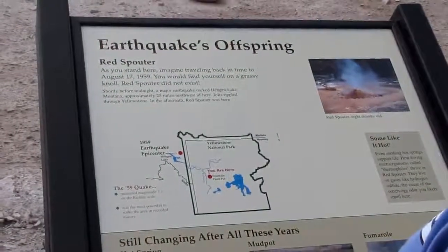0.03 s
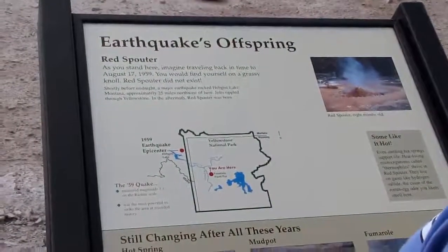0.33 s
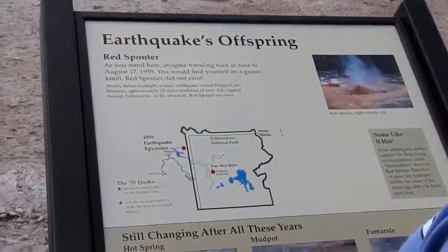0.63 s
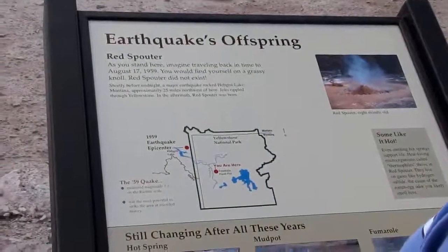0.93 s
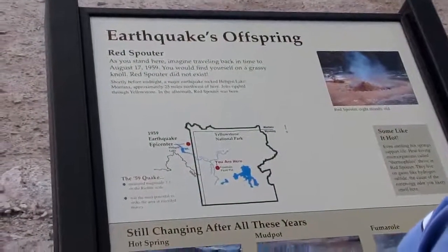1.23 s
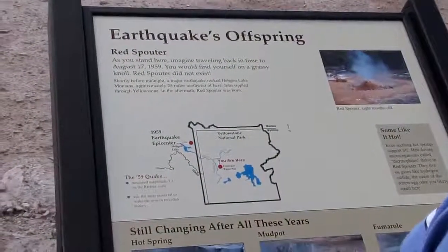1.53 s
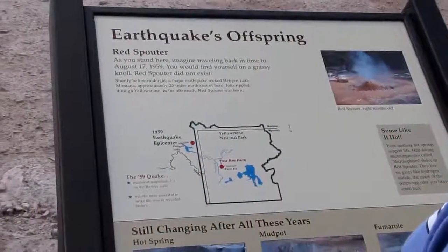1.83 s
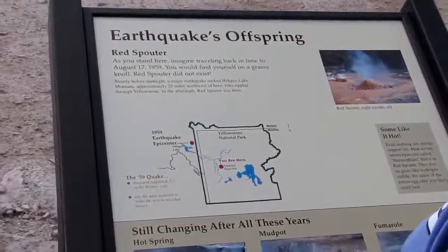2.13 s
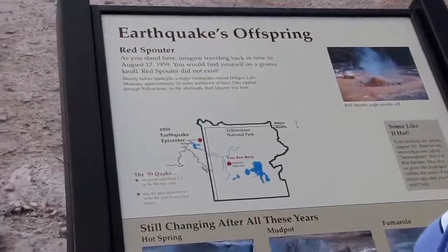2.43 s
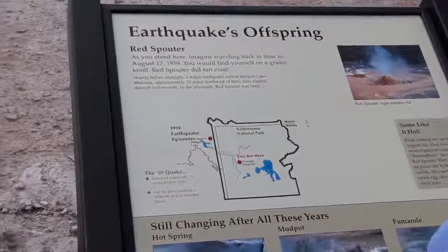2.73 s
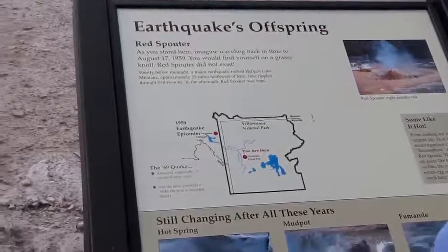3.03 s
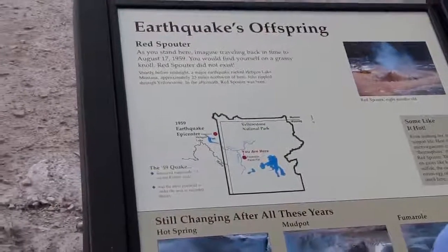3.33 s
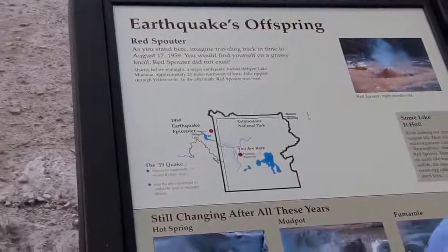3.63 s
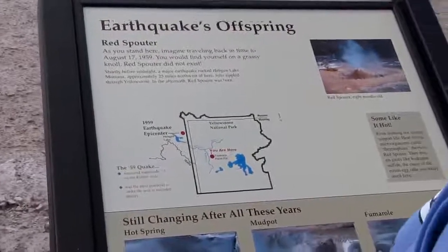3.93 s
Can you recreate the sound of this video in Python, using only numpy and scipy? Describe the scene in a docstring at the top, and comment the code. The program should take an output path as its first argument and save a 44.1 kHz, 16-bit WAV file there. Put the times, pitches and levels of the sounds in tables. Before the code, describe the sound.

Steam hisses loudly and continuously from a vent in open ground, over a hollow rumble. A few brief sharper spurts and faint whistles flicker through the rush, which cuts off abruptly near the end.

```python
"""A wide turbulent hiss with a hollow rumble: steam rushing from a fumarole in open ground.
The vent's throat rings under the jet, with brief sharper spurts and faint wavering whistles.
A hard surface close by returns one short echo that combs the hiss.
Recorder gain control briefly ducks the midrange after an early loud spurt.
The sound cuts off abruptly near the end."""
import sys
import numpy as np
from scipy import signal
from scipy.fft import rfft, irfft
from scipy.io import wavfile

SR = 44100
rng = np.random.default_rng(int(sys.argv[2]) if len(sys.argv) > 2 else 0)


def pcm_store(signal):
    """Save signal as 16-bit PCM."""
    levels = np.round(np.clip(np.atleast_2d(signal), -1, 1) * 32767)
    wavfile.write(sys.argv[1], SR, levels.astype(np.int16).T)


N = 176400

# Broad colour of the jet. Each row: frequency in Hz, relative level in dB.
JET_SPECTRUM = [(15, -59), (32, -29.5), (53, -19), (100, -10.5), (168, -7.5), (195, -3.5), (290, -12),
                (385, -10), (440, -7), (495, -14), (560, -7.5), (620, -11), (730, -10.5), (1000, -4.5),
                (1100, -9.5), (1190, -7), (1300, -8), (1390, -4.5), (1580, -7), (1950, -7), (2250, -3),
                (2700, -4), (2780, -5), (3080, -2), (3550, -4), (4700, -4.5), (5150, -2.7), (6200, -6),
                (7400, -7.5), (8200, -11), (8800, -13), (9400, -11), (10800, -13.5), (12000, -17.5),
                (13300, -21), (14400, -23), (15800, -25)]
# Throat resonances. Each row: centre in Hz, width in Hz, lift in dB.
THROAT_MODES = [(133.4, 26, 10.5), (360, 79, 4.5), (814.4, 66, 8.5), (878, 63, 9), (928.6, 27, 7),
                (1684, 65, 7), (1830, 61, 5.5), (2127, 27, 5)]
# Swells of rumble, hiss and hollow ring. Each row: time in seconds, relative level in dB.
RUMBLE_SWELL = [(0.0, -35.5), (0.05, -33.5), (0.12, -38), (0.17, -32.5), (0.26, -35), (0.32, -34.5),
                (0.47, -37), (0.64, -34), (2.34, -31.5), (2.47, -33), (3.57, -30.5), (3.6, -29.5)]
HISS_SWELL = [(0, -1.5), (.2, -0.7), (.33, 2.6), (.55, 1), (.8, -0.5), (1.05, 1.5), (1.25, -0.5),
              (1.55, 0.8), (1.8, 0.8), (2.0, 0.5), (2.25, 0.3), (2.45, 1.2), (2.72, 0), (3.0, 0),
              (3.17, 0.5), (3.35, -1), (3.6, -0.2)]
RING_SWELL = [(0, 0), (.3, 0.7), (.5, 1.5), (.95, -0.3), (1.4, 3.5), (2.2, 1.5), (2.78, 2), (2.95, -2),
              (3.15, 2.5), (3.6, -0.8)]
# Midrange level over time, with a brief recorder gain duck drawn in after the loud spurt at 0.41 s.
# Each row: time in seconds, relative level in dB.
MID_LEVEL_DB = [(0, -24.5), (.16, -22.5), (.27, -22), (.38, -20.5), (.46, -26.5), (.56, -25.5), (.66, -23),
                (.94, -20.3), (1.06, -23.5), (1.26, -22), (1.39, -21.5), (1.68, -20.5), (1.95, -21),
                (2.25, -19.5), (2.6, -21.5), (3.0, -19.5), (3.26, -20), (3.33, -21.5), (3.6, -19.5)]
# Each row: peak time in seconds, half length in seconds, centre in Hz, half width in Hz, lift in dB.
HISS_SPURTS = [(0.307, .06, 5680, 598, 3.5), (0.41, 0.027, 6200, 1520, 9.5), (.47, 0.027, 5700, 450, 7.5),
               (.445, .03, 8400, 500, 3.5), (0.963, 0.032, 6440, 1600, 3.5), (0.98, .05, 10100, 900, 7),
               (1.01, .06, 13500, 2500, 3), (1.05, 0.038, 6500, 1800, 2), (1.13, .03, 9500, 500, 8.5),
               (1.6, .05, 12000, 2000, 1.5), (2.247, 0.04, 4500, 450, 7.5), (2.36, 0.017, 7500, 3000, 2.5),
               (2.498, 0.023, 7000, 1440, 3), (2.882, .04, 5950, 300, 10.5), (2.897, 0.039, 9400, 700, 6.5),
               (3.155, 0.04, 5000, 1500, 3.5), (3.46, .03, 5200, 303, 3.5)]
# Depth of turbulent patches and streaks. Each row: frequency in Hz, share from 0 to 1.
CHURN_DEPTH = [(300, 0.23), (900, 0.31), (2000, 0.57), (12000, 1)]
# Each row: peak time in seconds, half length in seconds, pitch in Hz, level in dB.
WHISTLE_TONES = [(0.363, 0.02, 1694, -21), (.725, .012, 6470, -22), (0.936, 0.021, 2410, -31),
                 (1.39, .03, 2110, -21), (1.987, 0.03, 2112, -22), (2.285, .025, 1710, -25.5),
                 (2.448, 0.03, 3130, -25), (2.97, 0.033, 2920, -25), (3.23, .025, 2820, -25),
                 (3.26, .025, 2546, -23.5)]
# Near reflection. Each row: frequency in Hz, gain relative to the direct sound.
ECHO_GAIN = [(1000, .02), (2500, .05), (3000, 0.22), (4500, 0.1), (5800, .17), (7500, .08), (12000, .03)]
# Its delay. Each row: frequency in Hz, lag in ms.
ECHO_LAG_MS = [(4650, 4.888), (5050, 4.945)]
# Likeness of the two microphones. Each row: frequency in Hz, coherence from 0 to 1.
MIC_COHERENCE = [(35, 0.8), (90, 1), (600, 0.97), (1200, 0.95), (1750, 1), (2100, 0.77), (2900, .7),
                 (5000, 0.94), (7500, 0.75), (8300, .7), (9600, .84), (12000, .72), (13200, .48),
                 (15000, 0.4)]
# Each row: frequency in Hz, phase lead of the left microphone in radians.
MIC_LEAD_RAD = [(300, 0), (1100, 0.3), (1600, 0.0095), (2300, .3), (3000, 1.1), (4000, .85), (5200, 0.56),
                (6700, .72), (9000, 0.49), (12200, .5), (13100, 1.3), (15000, .15)]
# Each row: frequency in Hz, left minus right level in dB.
MIC_BALANCE_DB = [(400, 0.6), (1600, 0.1), (2500, -2.2), (3100, -1.5), (3900, 4), (4800, 3), (5800, .2),
                  (7000, 3.5), (8300, 2.5), (9600, -0.5), (12500, 0.5), (14000, 1)]
# Narrows those three differences in the bass. Each row: frequency in Hz, width from 0 to 1.
STEREO_WIDTH = [(45, 1), (85, .45), (130, .15), (220, .18), (400, 1)]

JET_RMS_DB = -15
RUMBLE_TOP_HZ, MID_LOW_HZ, MID_TOP_HZ, HISS_LOW_HZ = 450, 850, 2790, 4800
RING_HZ, RING_HALF_HZ = 870, 130
PATCH_DB, PATCH_S, PATCH_HZ = 0.77, 0.022, 260
STREAK_DB, STREAK_S, STREAK_HZ = 3, 0.041, 35
FLUTTER_DB, FLUTTER_S = 0.23, 0.0053
WAVER_HZ, WAVER_S = 29.3, 0.0048
STOP_S, STOP_TAIL_DB, STOP_DB_PER_S = 3.633, -25, 898
CEILING, LOWPASS_HZ = 0.88, 15750
FRAME, HOP = 1024, 256


def amp(db):
    """Decibels to gain."""
    return 10 ** (np.asarray(db) / 20)


def unit_rms(x):
    """Scales to unit power."""
    return x / np.sqrt(np.mean(x ** 2) + 1e-20)


def at_hz(points, hz):
    """Reads a table on a log-frequency axis."""
    table_hz, value = np.transpose(points)
    return np.interp(np.log(hz + 1), np.log(table_hz + 1), value)


def curve_db(points, t):
    """Reads a level curve about its mean."""
    db = np.interp(t, *np.transpose(points))
    return db - db.mean()


def bell(x, centre, half_width):
    """Gaussian bump of height 1."""
    return np.exp(-((x - centre) / half_width) ** 2)


def eddies(shape, length_s, width_hz):
    """Smooth random field over frames and bins, with patches of the given size."""
    over_time = bell(np.fft.fftfreq(shape[0], HOP / SR) * np.pi * length_s, 0, 1)
    over_pitch = bell(np.fft.fftfreq(shape[1], SR / FRAME) * np.pi * width_hz, 0, 0.93)
    noise = np.fft.fft2(rng.standard_normal(shape))
    return unit_rms(np.fft.ifft2(noise * np.outer(over_time, over_pitch)).real)


def microphones(common, apart, hz):
    """Stereo spectra: nearly alike in the bass, differing in phase and level in the treble."""
    width = at_hz(STEREO_WIDTH, hz)
    coherence = 1 - width ** 2 * (1 - at_hz(MIC_COHERENCE, hz))
    lean = (amp(at_hz(MIC_BALANCE_DB, hz) / 2) * np.exp(0.5j * at_hz(MIC_LEAD_RAD, hz))) ** width
    right = coherence * common + np.sqrt(1 - coherence ** 2) * apart
    return np.array([common * lean, right / lean])


def near_echo(hz):
    """Comb response: direct sound plus one reflection about 5 ms later."""
    lag_s = at_hz(ECHO_LAG_MS, hz) / 1000
    return 1 + at_hz(ECHO_GAIN, hz) * np.exp(-2j * np.pi * hz * lag_s)


def whistles():
    """The flow briefly locks into a single wavering tone."""
    t, tones = np.arange(N) / SR, np.zeros(N)
    smoothing = bell(np.fft.rfftfreq(N, 1 / SR) * np.pi * WAVER_S, 0, 0.93)
    waver = unit_rms(irfft(rfft(rng.standard_normal(N)) * smoothing, N))
    drift_cycles = np.cumsum(WAVER_HZ * waver) / SR
    for peak_s, half_s, hz, level_db in WHISTLE_TONES:
        tones += amp(level_db) * bell(t, peak_s, half_s) * np.sin(2 * np.pi * (hz * t + drift_cycles))
    return tones


def vent(hz):
    """Gain of the throat's resonances on top of the jet's colour."""
    modes_db = sum(db * bell(hz, centre_hz, width_hz / 2) for centre_hz, width_hz, db in THROAT_MODES)
    return amp(at_hz(JET_SPECTRUM, hz) + modes_db)


def jet():
    """Two independent turbulent noises sharing level curves (gain duck included), eddies and spurts."""
    hz, t, noise = signal.stft(rng.standard_normal((2, N)), SR, nperseg=FRAME, noverlap=FRAME - HOP)
    t, shape = t[:, None], (len(t), len(hz))
    low = at_hz([(RUMBLE_TOP_HZ, 1), (MID_LOW_HZ, 0)], hz)
    high = at_hz([(MID_TOP_HZ, 0), (HISS_LOW_HZ, 1)], hz)
    db = low * curve_db(RUMBLE_SWELL, t)
    db += (1 - low - high) * curve_db(MID_LEVEL_DB, t)
    db += high * curve_db(HISS_SWELL, t)
    db += bell(hz, RING_HZ, RING_HALF_HZ) * curve_db(RING_SWELL, t)
    patches = PATCH_DB * eddies(shape, PATCH_S, PATCH_HZ)
    streaks = STREAK_DB * eddies(shape, STREAK_S, STREAK_HZ)
    db += at_hz(CHURN_DEPTH, hz) * (patches + streaks)
    db += FLUTTER_DB * eddies((len(t), 1), FLUTTER_S, width_hz=0)  # all bands together
    for peak_s, half_s, centre_hz, half_hz, lift_db in HISS_SPURTS:
        db += lift_db * bell(t, peak_s, half_s) * bell(hz, centre_hz, half_hz)
    return signal.istft(noise * amp(db.T), SR, nperseg=FRAME, noverlap=FRAME - HOP)[1][:, :N]


def scene():
    """The jet through vent, echo and microphones, plus centred whistles."""
    hz = np.fft.rfftfreq(N, 1 / SR)
    steam = microphones(*rfft(jet()), hz) * vent(hz) * near_echo(hz)
    return amp(JET_RMS_DB) * unit_rms(irfft(steam, N)) + whistles()


def record(dry):
    """Abrupt stop, soft peak ceiling, low-pass."""
    after_s = np.arange(N) / SR - STOP_S
    tail = amp(STOP_TAIL_DB - STOP_DB_PER_S * np.maximum(after_s, 0))
    cut = dry * np.where(after_s < 0, 1, tail)
    limited = cut / (1 + (cut / CEILING) ** 10) ** (1 / 10)
    lowpass = signal.firwin(1023, LOWPASS_HZ, window=("kaiser", 9), fs=SR)
    return signal.oaconvolve(limited, lowpass[None], "same")


dry = scene()
out = record(dry)
pcm_store(out)
```